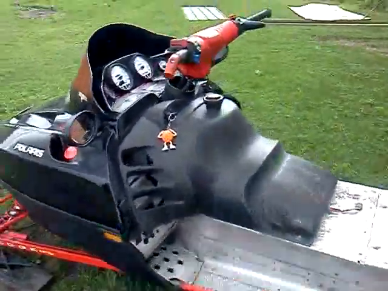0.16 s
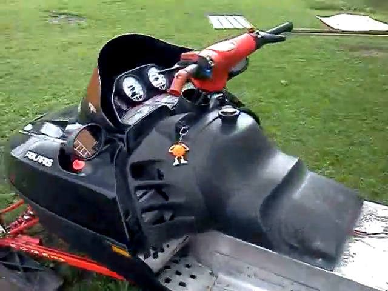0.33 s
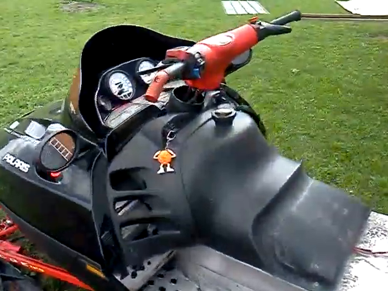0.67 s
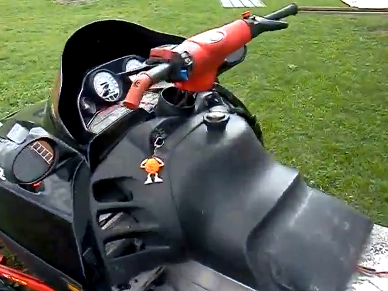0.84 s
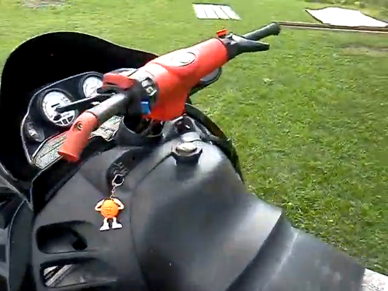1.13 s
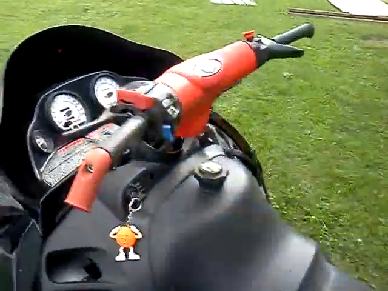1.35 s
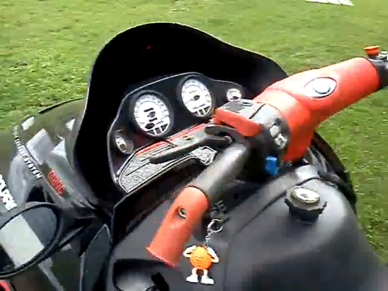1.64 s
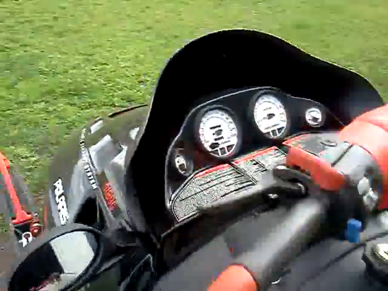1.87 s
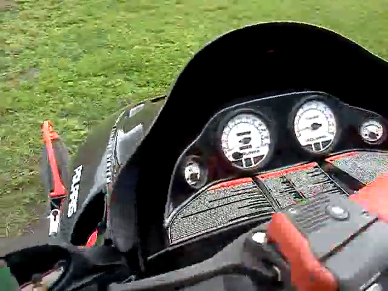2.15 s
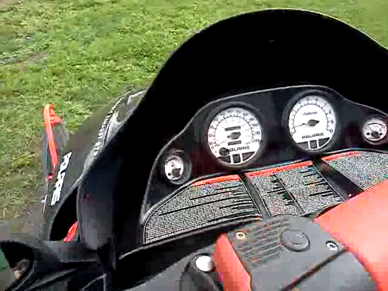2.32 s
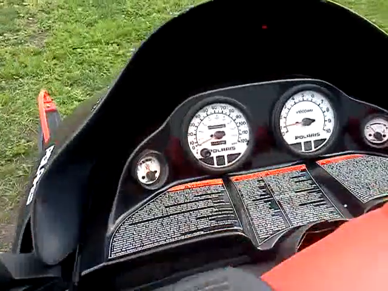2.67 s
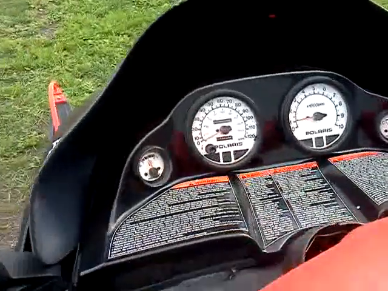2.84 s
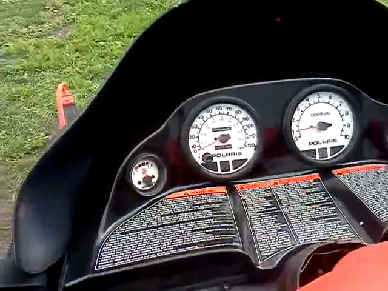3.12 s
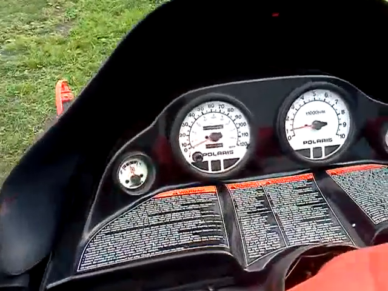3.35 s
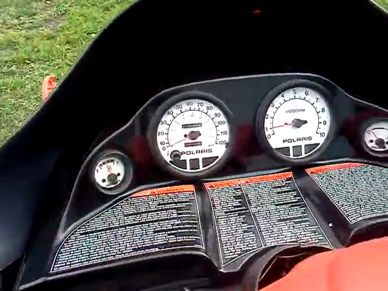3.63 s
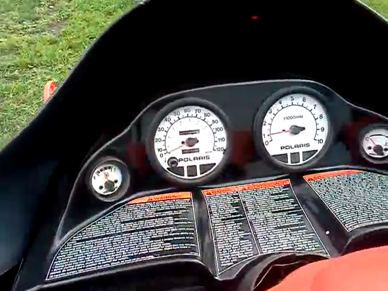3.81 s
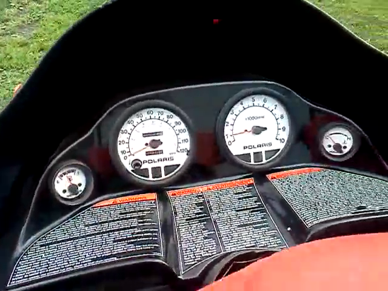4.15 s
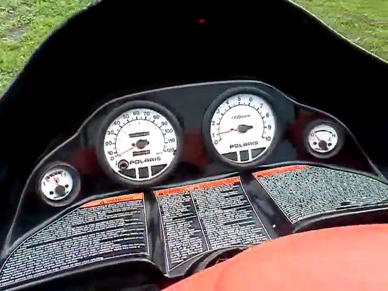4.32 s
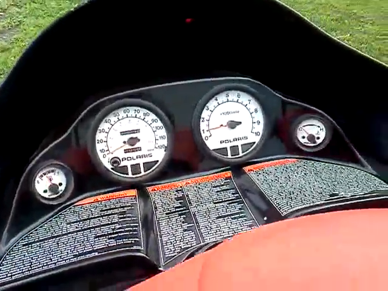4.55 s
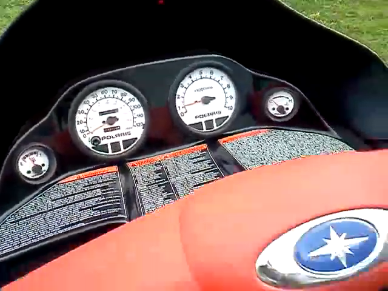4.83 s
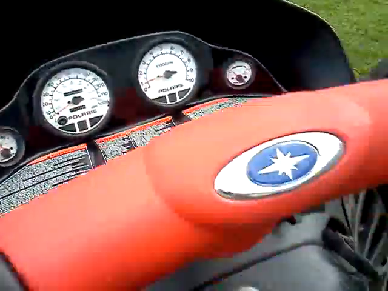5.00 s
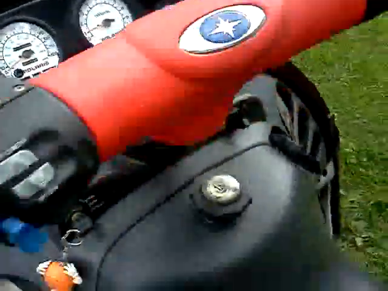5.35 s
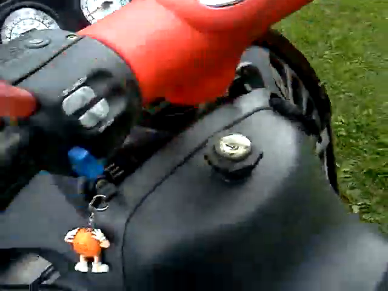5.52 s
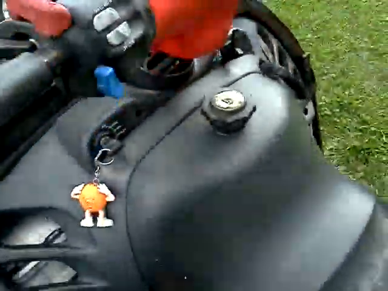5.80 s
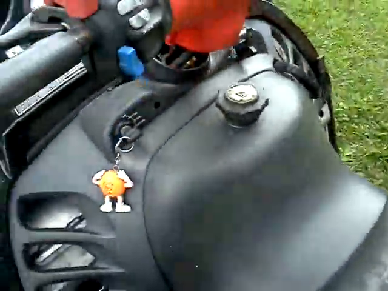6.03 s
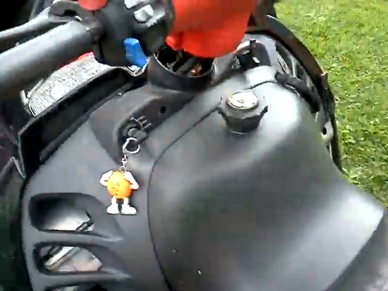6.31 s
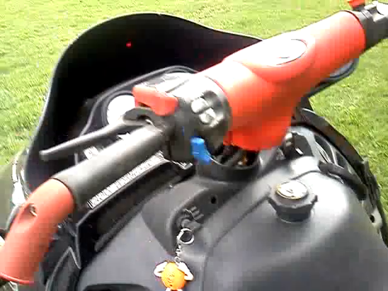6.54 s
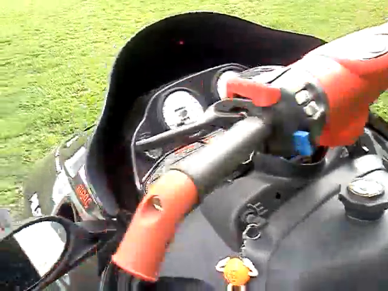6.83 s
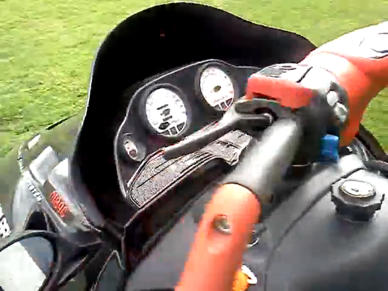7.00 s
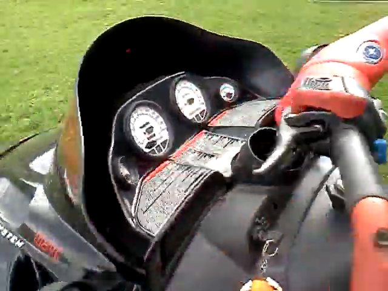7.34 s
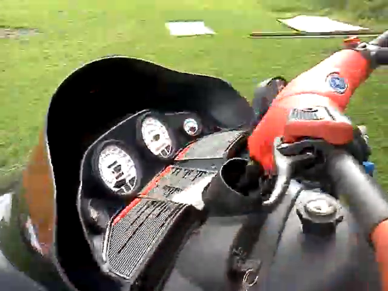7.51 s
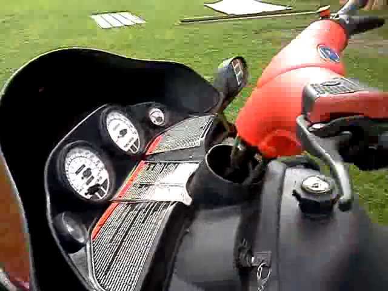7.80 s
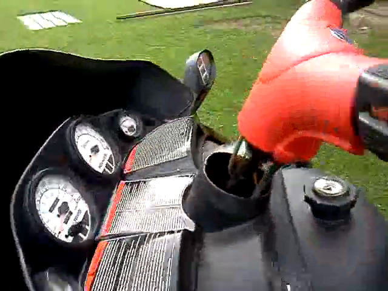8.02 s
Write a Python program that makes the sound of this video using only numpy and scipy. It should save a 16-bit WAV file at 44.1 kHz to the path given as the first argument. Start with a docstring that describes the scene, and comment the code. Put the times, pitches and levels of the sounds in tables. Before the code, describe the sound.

A two-stroke snowmobile engine idles close by, with uneven booming exhaust pops, steady mechanical clatter and occasional metallic knocks.

```python
"""Idling two-stroke snowmobile.

It stands on grass while a small microphone is carried round its handlebars and dashboard.
The engine catches only on some strokes: each catch pops the exhaust, which booms on two close,
beating modes. Pistons and clutch clatter on every stroke through the hood panels and the loose drive
knocks, over a low rumble. The dull microphone thumps as it is handled and overloads on the booms."""
import sys
import numpy as np
from scipy import signal
from scipy.fft import rfft, irfft
from scipy.io import wavfile

SR = 44100
rng = np.random.default_rng(int(sys.argv[2]) if len(sys.argv) > 2 else 0)


def waveform_to_disk(signal):
    """Save audio, clipped to [-1, 1], as 16-bit WAV at the path in sys.argv[1]."""
    frames = np.transpose(np.atleast_2d(signal))
    scaled = np.clip(frames, -1, 1) * 32767
    samples = np.round(scaled).astype(np.int16)
    wavfile.write(sys.argv[1], SR, samples)


N = 359856
TIME = np.arange(N) / SR


def from_db(db):
    """Decibels to gain."""
    return 10 ** (np.asarray(db) / 20)


def rms_one(x):
    """Scale to rms one."""
    return x / np.sqrt(np.mean(x ** 2) + 1e-20)


def chance(count):
    """Normal draws clipped at 1.6 sigma."""
    return np.clip(rng.standard_normal(count), -1.6, 1.6)


def clicks(times_s, sizes):
    """One impulse at each time."""
    out = np.zeros(N)
    np.add.at(out, np.clip(np.round(times_s * SR).astype(int), 0, N - 1), sizes)
    return out


def bursts(times_s, sizes, decay_s):
    """Envelope that swells to each size and dies away."""
    r = np.exp(-1 / (decay_s * SR))
    return signal.lfilter([np.e / (decay_s * SR)], [1, -2 * r, r * r], clicks(times_s, sizes) + 1e-18)


def grains(rate_hz=6000):
    """Dense small impacts of uneven size; rms one."""
    count = int(rate_hz * N / SR)
    sizes = from_db(2 * np.minimum(rng.exponential(1, count), 4)) * rng.choice([-1, 1], count)
    return rms_one(clicks(rng.uniform(0, N / SR, count), sizes))


def ring(drive, hz, t60_s):
    """Damped mode: a unit click starts a sine of height one."""
    r, w = np.exp(-np.log(1000) / (t60_s * SR)), 2 * np.pi * hz / SR
    return signal.lfilter([0, np.sin(w)], [1, -2 * r * np.cos(w), r * r], drive + 1e-18)


def resonance(x, hz, width_hz):
    """Band-pass, unity peak gain."""
    r, w = np.exp(-np.pi * width_hz / SR), 2 * np.pi * hz / SR
    return signal.lfilter(np.array([1, 0, -1]) * (1 - r * r) / 2, [1, -2 * r * np.cos(w), r * r], x)


def colour(x, spectrum):
    """Shape by a smooth spectrum, rolled off beyond both ends; rms one."""
    hz, db = np.transpose(spectrum)
    bins_hz = np.maximum(np.arange(N // 2 + 1) * SR / N, 1)
    gain = from_db(np.interp(np.log(bins_hz), np.log(hz), db))
    skirts = np.minimum(hz[-1] / bins_hz, 1) ** 2 * np.minimum(bins_hz / hz[0], 1)
    return rms_one(irfft(rfft(x) * gain * skirts, N))


# Firing runs: start t/s, second cylinder's answer on the next stroke/0-1
FIRING_RUNS = [(0.043, .7), (.099, 0), (0.162, 0), (0.222, .8), (0.289, 1), (0.375, 1), (.461, 0.7),
               (.634, 1), (0.781, 1), (0.896, 1), (0.979, 0.03), (1.045, 0.01), (1.217, 1), (1.339, 0),
               (1.384, 0.92), (1.506, 0.9), (1.612, 1), (1.7, 0.6), (1.871, 0.9), (1.958, 0.04),
               (2.188, 0.9), (2.497, 0.1), (2.66, 0), (2.823, 0), (3.112, 0), (3.371, 0.05), (3.606, 0.8),
               (3.935, 0.5), (4.304, 1), (4.416, .8), (4.668, 1), (4.79, 0.3), (5.398, 0.7), (5.625, .5),
               (5.789, 0.7), (5.952, 0.6), (6.18, 0), (6.239, 0), (6.302, 0), (6.343, 0.3), (6.554, 0.7),
               (6.744, 1), (6.853, 0.7), (7.04, 0.94), (7.21, 0.8), (7.476, 1), (7.662, 0.85),
               (7.767, 0.12), (7.997, .9)]


def crank(stroke_hz=47.6, catch_every=3, stumble_strokes=3):
    """Every third stroke catches until the engine stumbles: (t/s, catch/0-1, running flag)."""
    rows = [(.0065, .015, False)]
    ends_s = [start_s for start_s, _ in FIRING_RUNS[1:]] + [N / SR + (stumble_strokes + 1) / stroke_hz]
    for (start_s, answer), end_s in zip(FIRING_RUNS, ends_s):
        count = round((end_s - start_s) * stroke_hz)
        for k, at_s in enumerate(np.linspace(start_s, end_s, count, endpoint=False)):
            running = k == 0 or k < count - stumble_strokes
            caught = answer if k == 1 else (running and k % catch_every == 0)
            rows.append((at_s, caught, running))
    return np.transpose([row for row in rows if row[0] < N / SR])


def piston_slaps(lead_s=.01958, jitter_s=.0021, catch_db=2.17, spread_db=1.42):
    """Each piston slaps at the top of its stroke, before the port opens: (t/s, force/dB)."""
    strokes_s, caught, _ = crank()
    times_s = strokes_s - lead_s + jitter_s * chance(len(strokes_s))
    return times_s, catch_db * caught + spread_db * chance(len(times_s))


def rattle(slaps, steady, spread_db, decay_s, scatter_s=0):
    """Impacts thrown up by each slap, over a steady chatter; rms one."""
    times_s, force_db = slaps
    count = len(times_s)
    sizes = from_db(force_db + spread_db * chance(count))
    return rms_one(grains() * (steady + bursts(times_s + scatter_s * chance(count), sizes, decay_s)))


# Intake and chassis spectrum: f/Hz, relative level/dB
RUMBLE_SPECTRUM = [(20, -19.5), (35, -10), (60, -3.5), (100, 0), (160, -0.5), (230, 14.5), (330, 8.5),
                   (420, -0.5), (520, -10.5), (700, -18)]


def rumble(slaps, level_db=-20.5):
    """Intake and chassis rumble, pulsing with the slaps."""
    shaking = rattle(slaps, steady=.99, spread_db=3.5, decay_s=.0033)
    return from_db(level_db) * colour(shaking, RUMBLE_SPECTRUM)


def struck(blows, modes, gain_db, decay_s, spread_db=2):
    """Each blow is a short flurry of contacts that excites every mode with its own strength."""
    times_s, blow_db = np.transpose(blows)
    out = 0
    for hz, mode_db, t60_s in modes:
        sizes = from_db(blow_db + gain_db + mode_db + spread_db * chance(len(times_s)))
        flurry = bursts(times_s, sizes, decay_s) * grains()
        out += ring(flurry, hz, t60_s) / np.sqrt(t60_s * SR)
    return out


# Handling thumps: t/s, relative level/dB
HANDLING_THUMPS = [(.2, -22.5), (1.008, -24), (7.735, -26), (7.918, -30), (7.96, -24), (8.008, -21)]
# Thump modes: f/Hz, relative level/dB, t60/s
THUMP_MODES = [(392, 7.5, 0.089), (418, 8, 0.0065), (760, -9.5, 0.069)]


def handling_thumps():
    """Dull handling thumps ring briefly near 400 Hz."""
    return struck(HANDLING_THUMPS, THUMP_MODES, gain_db=16, decay_s=.005)


# Loudest knocks of the drive: t/s, relative level/dB
DRIVE_BLOWS = [(.772, -11), (1.029, -7.5), (1.096, -10.5), (1.202, -12), (1.488, -10), (1.594, -11.5),
               (1.918, -10), (2.308, -13), (2.705, -6), (2.869, -16), (3.175, -15.5), (3.995, -5),
               (5.443, -13), (5.606, -10), (6.06, -10), (6.163, -12), (6.393, -8.5), (6.682, -3.5),
               (6.918, -18), (7.025, -5.5), (7.193, -5.5), (7.316, -12), (7.544, -6), (7.645, -7.5),
               (7.823, -3.5), (7.98, -7)]
# Modes of the rattling parts: f/Hz, relative level/dB, t60/s
DRIVE_MODES = [(816, -11.5, 0.01), (1168, -7.5, 0.18), (1442, 0.5, 0.046), (1754, 0.5, 0.19),
               (2045, 2.5, 0.012), (2226, -9.5, .04), (2722, -3, 0.035), (3305, -11, 0.049)]


def drive_knocks(slaps, light_share=.08, light_db=-14.5):
    """The loose drive knocks hard at set times; the odd slap shakes it more lightly."""
    times_s, _ = slaps
    levels_db = light_db + chance(len(times_s))
    light_blows = np.c_[times_s, levels_db][rng.random(len(times_s)) < light_share]
    return struck(np.r_[DRIVE_BLOWS, light_blows], DRIVE_MODES, gain_db=2, decay_s=.0046)


def engine_block(slaps, count=20, relative_width=.041):
    """The slaps shake the block's many modes, each with its own strength; rms one."""
    out = 0
    for hz in np.geomspace(650, 3500, count) * rng.uniform(.98, 1.02, count):
        shaking = rattle(slaps, steady=0, spread_db=5, decay_s=.0063, scatter_s=.0053)
        out += resonance(shaking, hz, relative_width * hz)
    return rms_one(out)


# Piston, clutch and cooling fin spectrum: f/Hz, relative level/dB
CLATTER_SPECTRUM = [(300, 6.5), (480, 3.5), (700, -2), (900, -2.5), (1200, 2.5), (1600, 0.5), (2000, -2.5),
                    (2500, -4.5), (3000, -6.5), (3400, -5.5), (4200, -3)]
# Clatter along the microphone's path: t/s, relative level/dB, relative treble level/dB
CLATTER_PATH = [(0, -19.5, -26), (.8, -20.5, -23), (1.3, -18, -22), (2.4, -16, -19.5), (4, -17.5, -22.5),
                (5.6, -16.5, -22), (6.2, -17, -21), (7.1, -18, -18.5), (8.15, -18, -19.5)]
# Panels and metal parts, loudest as the microphone passes or they shake loose:
# f/Hz, nominal width/Hz, relative level/dB, loudest t/s, spread/s
PANEL_MODES = [(695, 173, -7.5, 4.22, 1.53), (959, 184, -5, 4.12, 1.45), (1094, 120, -5, 5.18, 0.2),
               (1165, 85, -11, 6.96, 0.43), (1198, 200, -3.5, 0.2, 0.78), (1473, 64, -5, 3.2, 0.17),
               (1432, 59, -10.5, 7.73, 0.36), (1680, 77, -12, 8.46, 0.37), (1793, 220, -8.5, 3.68, 0.96),
               (1830, 470, -1.5, 7.73, 0.86), (2308, 72, -9.5, 1.33, 0.6), (2299, 86, -7, 6.87, 0.4),
               (2288, 69, -18.5, 7.2, 1.3), (2690, 98, -10, 8.9, 0.55), (2830, 280, -9.5, 4.03, 0.73),
               (1745, 70, -11.5, 1, 0.45), (1189, 12, 5, 6.73, 0.023), (400, 180, -11, 7.94, 0.26)]


def hood_clatter(slaps, split_hz=2000):
    """Clatter comes through the vents and rings the panels; the windshield shades its treble."""
    path_s, *levels_db = np.transpose(CLATTER_PATH)
    clatter_db, treble_db = [np.interp(TIME, path_s, db) for db in levels_db]
    impacts = rattle(slaps, steady=1, spread_db=4.5, decay_s=.0025)
    broad = colour(impacts, CLATTER_SPECTRUM) + colour(engine_block(slaps), CLATTER_SPECTRUM)
    low = signal.sosfiltfilt(signal.butter(3, split_hz, fs=SR, output="sos"), broad)
    out = from_db(clatter_db - 2) * rms_one(low) + from_db(treble_db - 1) * rms_one(broad - low)
    for hz, width_hz, panel_db, loudest_s, spread_s in PANEL_MODES:
        swell = np.exp(-.5 * ((TIME - loudest_s) / spread_s) ** 2)
        shaking = rattle(slaps, steady=.15, spread_db=6, decay_s=.0098, scatter_s=.0051)
        stage_width_hz = 1.27 * width_hz
        tone = resonance(resonance(shaking, hz, stage_width_hz), hz, stage_width_hz)
        out += from_db(clatter_db + panel_db) * swell * rms_one(tone)
    return out


# Pipe and silencer modes: f/Hz, relative level/dB, t60/s, polarity
PIPE_MODES = [(277.3, 0, .215, 1), (247.4, -.9, .1, -1), (207, -21, .14, -1), (186, -23, .17, -1),
              (328, -26, .15, 1)]
# Boom along the microphone's path, shaded behind the windshield: t/s, relative level/dB
BOOM_PATH = [(0, 1), (1.9, -.5), (2.8, -4.5), (3.7, -9.5), (4.6, -8), (5.2, -4.5), (5.8, -0.5),
             (8.15, -0.5)]


def exhaust(stray_share=.2, stray_db=-3.5, puff_db=-15, gas_db=-54, jitter_s=.001, gain_db=-1.26):
    """Catches and weak puffs between them ring the pipe; its opposed modes swell, cancel and swell."""
    times_s, caught, running = crank()
    count = len(times_s)
    strays = running * (rng.random(count) < stray_share) * from_db(stray_db)   # catches out of turn
    pops = np.maximum(caught, strays) * from_db(.57 * chance(count))
    puffs = from_db(puff_db + 3 * chance(count))
    sizes = np.maximum(pops, puffs) * from_db(np.interp(times_s, *np.transpose(BOOM_PATH)))
    ports_s = times_s + jitter_s * chance(count)
    gas = from_db(gas_db) * rng.standard_normal(N) * bursts(ports_s, sizes, decay_s=.008)
    silencer = signal.butter(2, [160, 700], "band", fs=SR, output="sos")   # rounds each pop
    pulses = signal.sosfilt(silencer, clicks(ports_s, sizes) + gas)
    return sum(polarity * from_db(mode_db + gain_db) * ring(pulses, hz, t60_s)
               for hz, mode_db, t60_s, polarity in PIPE_MODES)


def scene():
    """All sources in open air, mono."""
    slaps = piston_slaps()
    mix = exhaust() + rumble(slaps) + hood_clatter(slaps) + handling_thumps() + drive_knocks(slaps)
    return mix[None]


def overload(x, ceiling=.72, knee_share=.97):
    """Amplifier: linear up to the knee, then rounded into a flat top."""
    knee = knee_share * ceiling
    headroom = ceiling - knee
    excess = np.maximum(np.abs(x) - knee, 0)
    return np.sign(x) * (np.minimum(np.abs(x), knee) + headroom * np.tanh(excess / headroom))


def record(dry):
    """Narrow-band microphone; its amplifier clips the booms, adding crackle above the band."""
    heard = signal.sosfilt(signal.butter(1, 22, "high", fs=SR, output="sos"), dry)
    heard = signal.sosfilt(signal.butter(10, 3314, fs=SR, output="sos"), heard)
    heard = signal.sosfilt(signal.ellip(8, .1, 70, 4150, fs=SR, output="sos"), heard)
    return signal.sosfilt(signal.ellip(10, .1, 80, 15900, fs=SR, output="sos"), overload(heard))


dry = scene()
out = record(dry)
waveform_to_disk(out)
```